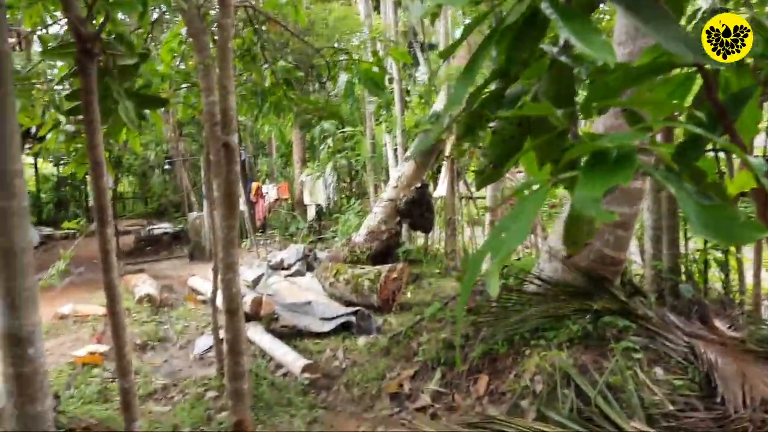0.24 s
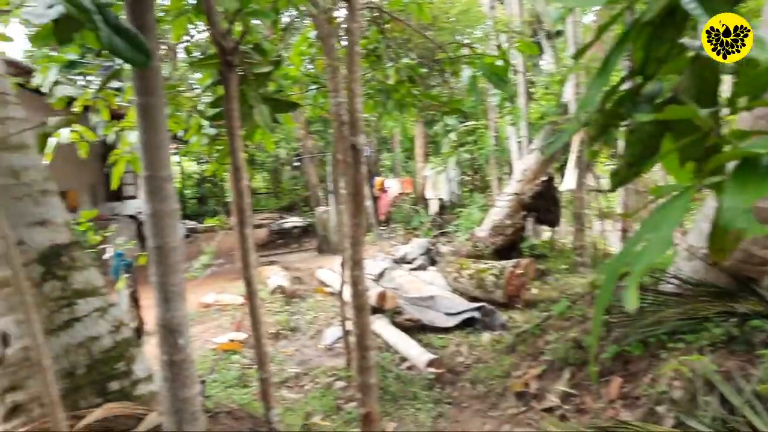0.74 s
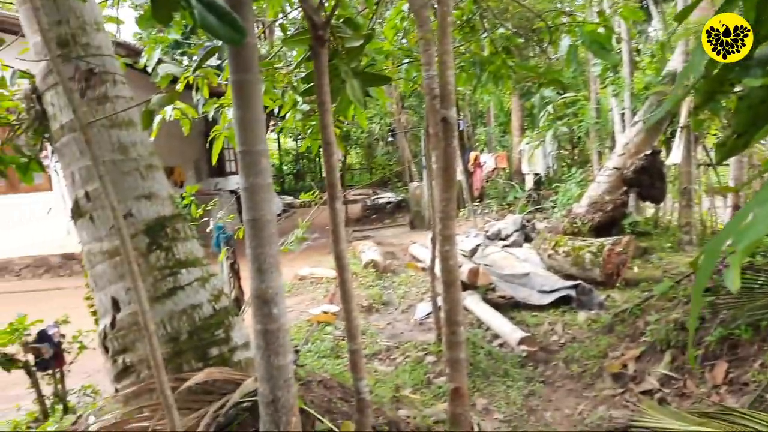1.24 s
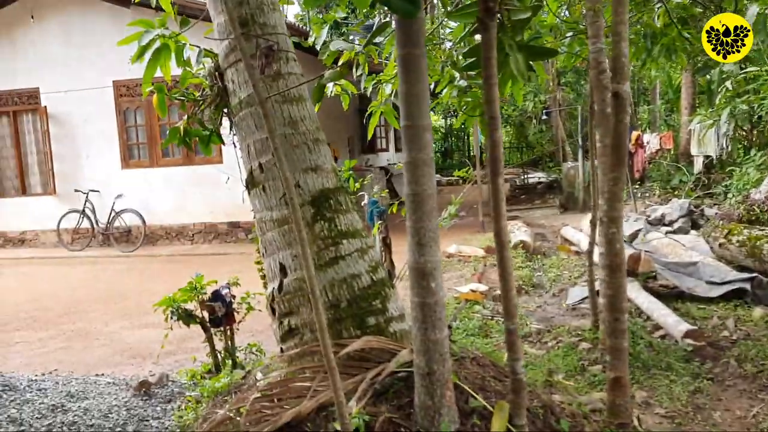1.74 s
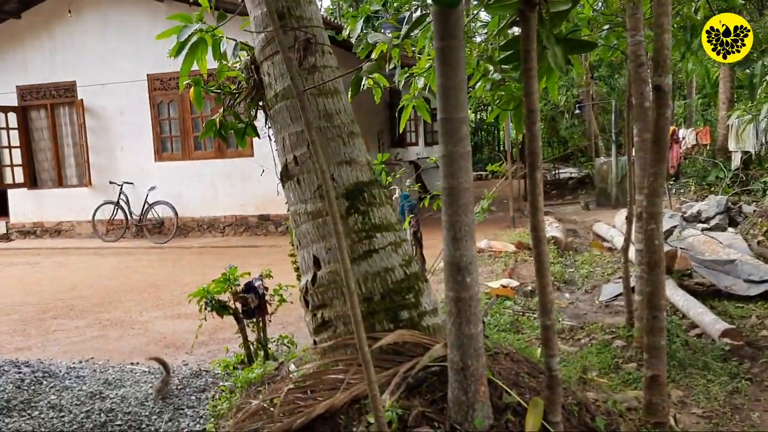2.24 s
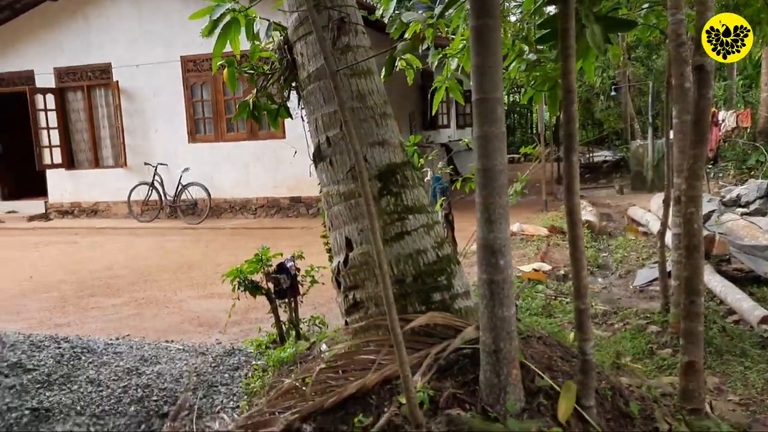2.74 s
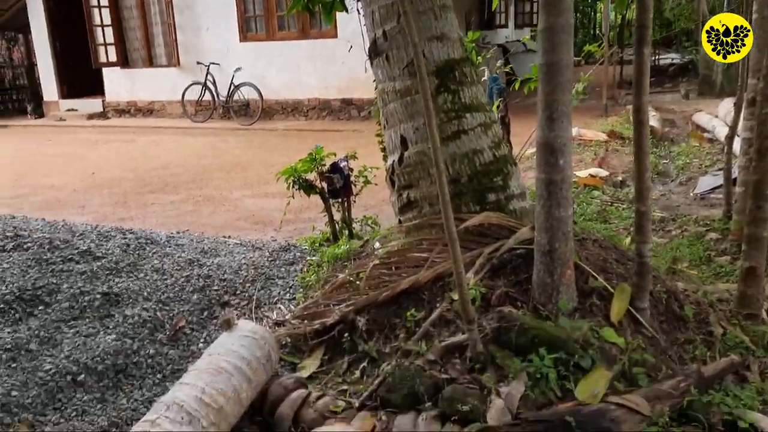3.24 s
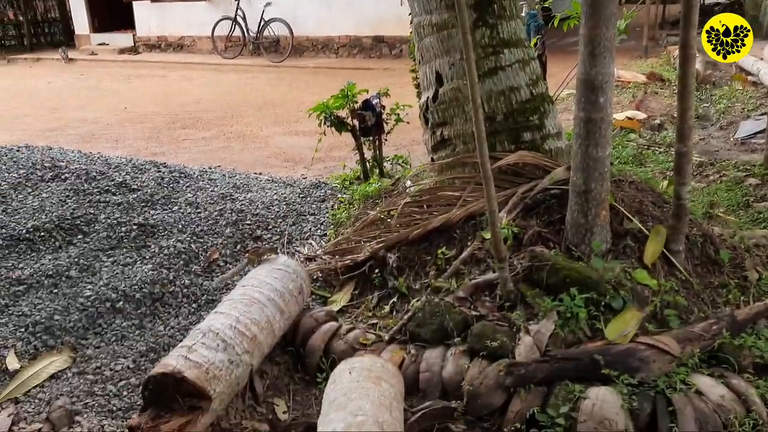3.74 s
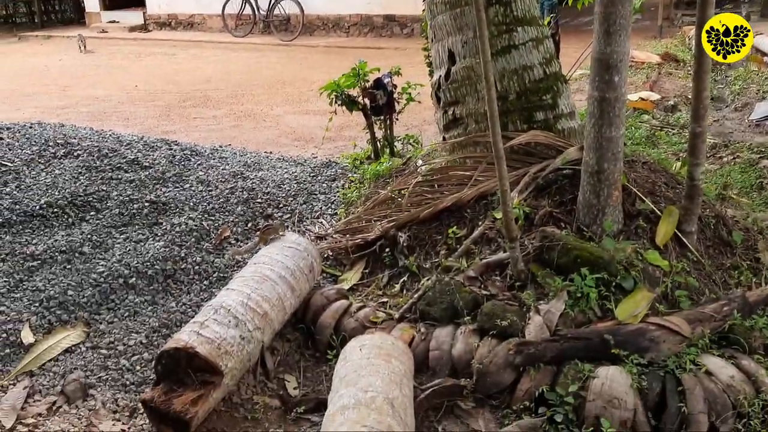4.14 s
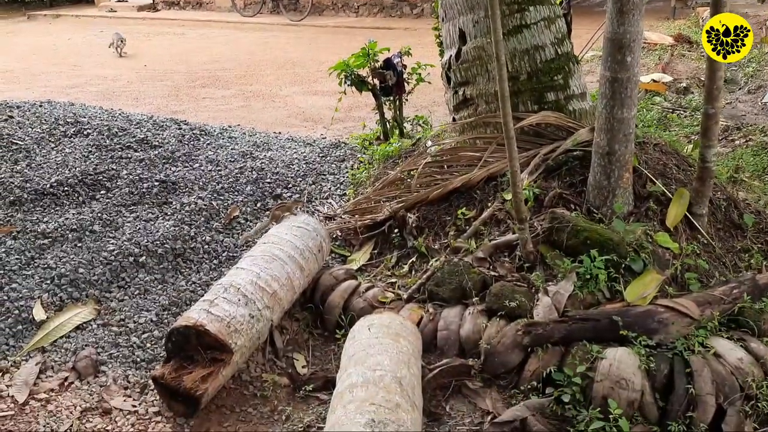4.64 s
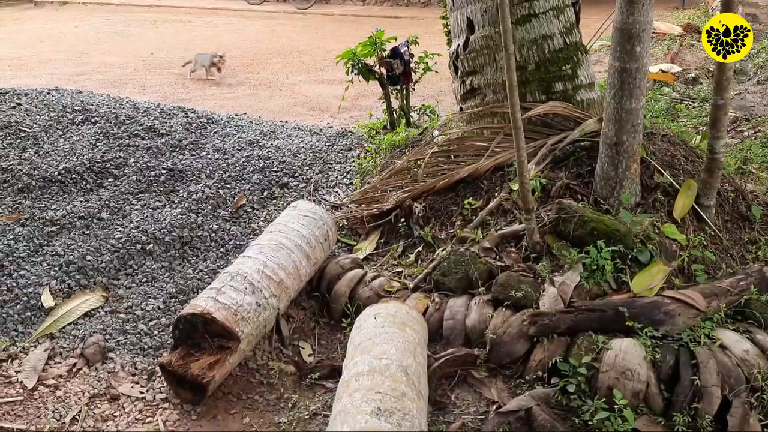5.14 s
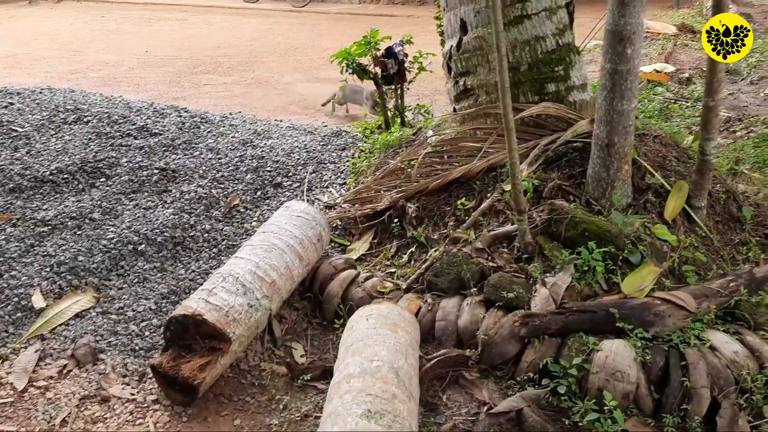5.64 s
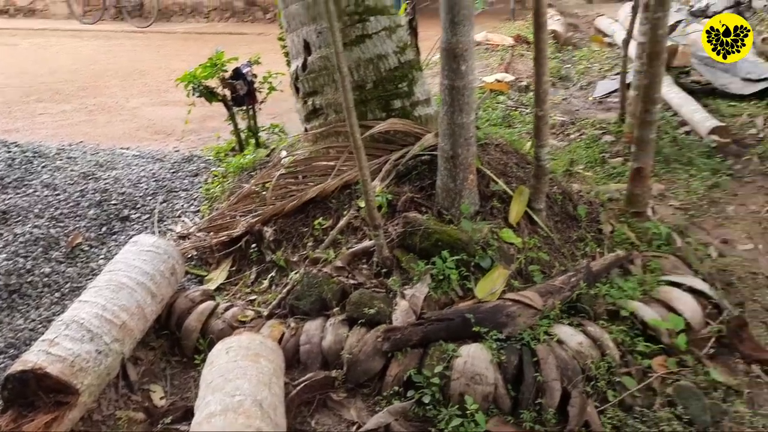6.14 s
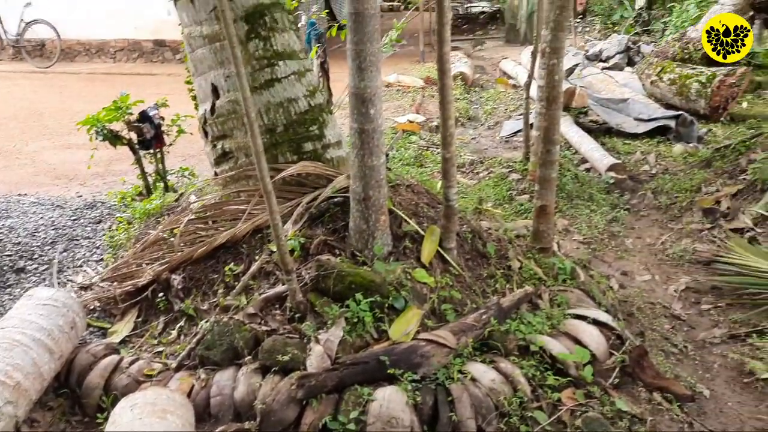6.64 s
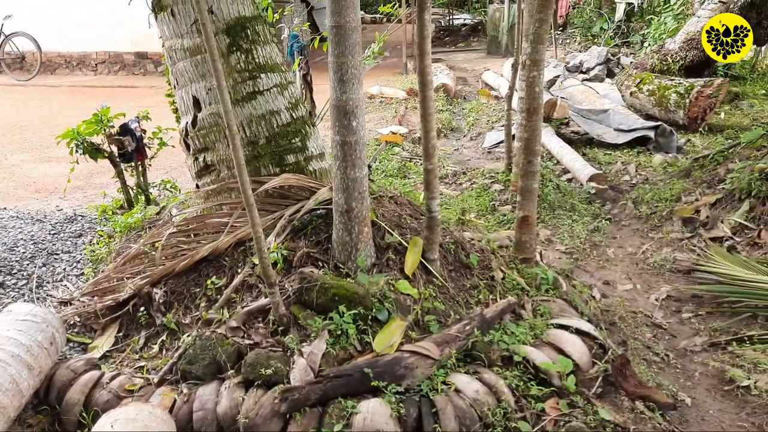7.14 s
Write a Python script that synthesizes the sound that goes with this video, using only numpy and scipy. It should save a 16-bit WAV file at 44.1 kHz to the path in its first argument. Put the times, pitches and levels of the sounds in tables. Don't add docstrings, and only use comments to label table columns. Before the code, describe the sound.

Outdoors among trees beside a house, a hand-held phone picks up low wind and distant traffic rumble, leaf hiss, thin crickets and far bird whistles. Dull knocks hit the case, then hoarse bird chucks repeat. Past the middle, a squirrel fires rapid piercing whistled chips; after a brief gap others answer, joined by a higher voice. Echoes smear every call.

```python
import sys
import numpy as np
from scipy import signal
from scipy.fft import rfft, irfft, next_fast_len
from scipy.io import wavfile
from scipy.ndimage import uniform_filter1d

SR = 44100
rng = np.random.default_rng(int(sys.argv[2]) if len(sys.argv) > 2 else 0)


def to_wav(sig):
    pcm = np.clip(np.atleast_2d(sig), -1, 1) * 32767
    pcm = np.round(pcm).astype(np.int16)
    wavfile.write(sys.argv[1], SR, pcm.T)


def amplitude_ratio(level_db):
    exponent = np.asarray(level_db, float) / 20
    return 10 ** exponent


N = 325899


def level(x, db):
    return x * amplitude_ratio(db) / np.sqrt(np.mean(x ** 2))


def shaped(x, gain):
    size = next_fast_len(N)
    hz = np.arange(size // 2 + 1) * SR / size + 1e-3
    return irfft(rfft(x, size) * gain(hz), size)[..., :N]


def walk(rate):
    hold = int(SR / rate)
    steps = np.repeat(rng.standard_normal(N // hold + 1), hold)
    return 1.385 * uniform_filter1d(uniform_filter1d(steps, hold), hold)[:N]


def add(out, s, sound, pan_db):
    i = int(s * SR)
    out[:, i:i + len(sound)] += amplitude_ratio([[pan_db / 2], [-pan_db / 2]]) * sound[:N - i]


def whistle(rows, overtones, edge_s, hoarse_hz, crack=0):
    s, hz, db = np.transpose(rows)
    t = np.arange(s[0] - edge_s, s[-1] + edge_s, 1 / SR)
    tremble = uniform_filter1d(rng.standard_normal(N // 8)[:len(t)], size=40) * np.sqrt(40)
    pitch = uniform_filter1d(np.interp(t, s, hz), size=200)
    drop = np.log2(pitch.max() / pitch)
    phase = 2 * np.pi * np.cumsum(pitch + hoarse_hz * (1 + crack * drop ** 2) * tremble) / SR
    tone = np.sin(phase)
    for k, (second_up_db, lift) in enumerate(overtones):
        tone = tone + amplitude_ratio(second_up_db + lift * drop) * np.sin((k + 2) * phase)
    fade = np.clip(np.minimum(t - t[0], t[-1] - t) / (2 * edge_s), 0, 1) ** 2
    return np.sqrt(2) * tone * fade * np.interp(t, s, amplitude_ratio(db))


def yard(x, t60_s, wet_db, early_db, sparse_db, lag_s=-0.000408):
    t = np.arange(int(1.2 * SR)) / SR
    echoes = rng.standard_normal((2, len(t))) * amplitude_ratio(sparse_db * rng.exponential(size=(2, len(t))))
    low = signal.sosfiltfilt(signal.butter(4, 7000, fs=SR, output="sos"), echoes)
    late = low * amplitude_ratio(-60 * t / t60_s) + (echoes - low) * amplitude_ratio(2.0 - 60 * t / (0.83 * t60_s))
    late = level(late * (1 - np.exp(-t / 0.0076)), wet_db)
    early = level(echoes[::-1] * amplitude_ratio(-60 * t / 0.036), early_db)
    direct = shaped(x, lambda hz: np.exp(-1j * np.pi * hz * lag_s * np.array([[1], [-1]])))
    echo = (early + late) / np.sqrt(len(t))
    return direct + signal.fftconvolve(np.mean(x, 0, keepdims=True), echo, axes=1)[:, :N]


def air():
    # (frequency [Hz], density [dB per Hz])
    air_colour = [(15, -42), (46, -10), (60, -1.5), (107, 1.5), (163, -16), (558, -19.5), (624, -26),
                  (738, -23.5), (1570, -26), (2320, -25), (3740, -37.5), (4810, -31.5), (5230, -32),
                  (7110, -43), (16000, -59)]
    # (frequency [Hz], correlation [-1..1])
    port_likeness = [
        (60, 1),
        (130, 0.93),
        (290, 0.96),
        (640, 0.37),
        (1400, -0.24),
        (3000, -0.039),
    ]
    # (time [s], level [dB])
    gusts = [
        (0, 5.5),
        (.07, 0),
        (2.5, 0),
        (2.68, 1.5),
        (3.0, -1),
        (5.06, 1),
        (5.91, -2.5),
        (6.5, 1),
        (7.39, 3.5),
    ]
    hz, db = np.transpose(air_colour)
    like_hz, like = np.transpose(port_likeness)
    gust_db = np.interp(np.arange(N) / SR, *np.transpose(gusts))

    def likeness(f):
        return np.clip(np.interp(np.log(f), np.log(like_hz), like), -1, 1)

    def colour(f):
        return amplitude_ratio(np.interp(np.log(f), np.log(hz), db))

    mid = shaped(rng.standard_normal(N), lambda f: colour(f) * np.sqrt(1 + likeness(f)))
    side = shaped(rng.standard_normal(N), lambda f: colour(f) * np.sqrt(1 - likeness(f)))
    both = np.array([mid + side, mid - side])
    rumble = shaped(both, lambda f: 1 / (1 + (f / 170) ** 4))
    murmur = shaped(both - rumble, lambda f: 1 / (1 + (f / 1800) ** 4))
    hiss = both - rumble - murmur
    quiet_db = -57
    hiss = hiss * amplitude_ratio(quiet_db + 0.64 * walk(21)) / np.std(murmur)
    rumble = level(rumble, -49.5) * amplitude_ratio(gust_db + 1.1 * walk(3.5))
    murmur = level(murmur, -52) * amplitude_ratio(gust_db)
    hum_hz = 73 + 1.6 * walk(1.8)
    hum = np.sqrt(2) * amplitude_ratio(-65.5 + 2.4 * walk(1.0)) * np.sin(2 * np.pi * np.cumsum(hum_hz) / SR)
    left_db = -2.5
    return (rumble + murmur + hiss + hum) * amplitude_ratio([[left_db / 2], [-left_db / 2]])


def cricket(gain, hz, trill_hz, depth, smear_hz):
    t = np.arange(N) / SR
    tone = np.sin(2 * np.pi * np.cumsum(hz + smear_hz * walk(250)) / SR)
    throb = 1 + depth * np.sin(2 * np.pi * trill_hz * t)
    return np.sqrt(2) * tone * throb * gain * amplitude_ratio(2.1 * walk(25))


def chirps(rows):
    attack_s, hold_s, fade_db_per_s = 0.004, 0.09, 195
    gain, t = np.zeros((2, N)), np.arange(SR // 2) / SR
    shape = np.clip(t / attack_s, 0, 1) * amplitude_ratio(-fade_db_per_s * np.maximum(t - hold_s, 0))
    for s, db in rows:
        add(gain, s, amplitude_ratio(db) * shape, 0)
    return gain[0]


def insects():
    # (time [s], level [dB])
    low_chirps = [(0, -66.5), (.5, -70.5), (.75, -66), (.98, -69), (5.56, -59.5), (5.73, -59.5),
                  (5.95, -57.5), (6.18, -59.5), (6.41, -57.5), (6.72, -62), (7.05, -59.5), (7.26, -58.5)]
    # (time [s], level [dB])
    high_chirps = [(0, -65.5), (.25, -69), (.47, -71), (.73, -64), (.97, -65.5), (1.2, -64.5), (1.46, -67),
                   (1.79, -68), (2.09, -64), (2.41, -64), (2.69, -73), (2.98, -73), (3.26, -73),
                   (3.55, -72.5), (3.8, -67), (4.05, -74.5), (5.56, -63.5), (5.73, -60)]
    # (time [s], level [dB])
    chorus_level = [
        (1.0, -89),
        (1.2, -70),
        (3.0, -61.5),
        (3.6, -91),
        (4.2, -77.5),
        (5.4, -76),
        (6.0, -68),
        (7.39, -65.5),
    ]
    # (time [s], low voice [Hz], high voice [Hz])
    cricket_pitch = [
        (0, 2487, 4860),
        (1.5, 2440, 4910),
        (2.102, 2364, 4840),
        (3.2, 2296, 4740),
        (4.2, 2405, 4780),
        (5.499, 2505, 5020),
        (6.6, 2516, 5050),
        (6.749, 2457, 5050),
    ]
    t = np.arange(N) / SR
    s, *pitch = np.transpose(cricket_pitch)
    low_hz, high_hz = (np.interp(t, s, hz) for hz in pitch)
    chorus = amplitude_ratio(np.interp(t, *np.transpose(chorus_level)))
    low = cricket(chirps(low_chirps) + chorus, low_hz, trill_hz=47.9, depth=0.24, smear_hz=45.1)
    high = cricket(chirps(high_chirps), high_hz, trill_hz=57.8, depth=0.83, smear_hz=56.3)
    near = yard(amplitude_ratio([[-1.5], [1.5]]) * low + high, t60_s=0.65, wet_db=-3.5, early_db=1, sparse_db=0)
    cicada_hz, cicada_width_hz = 7015, 356
    cicada = shaped(rng.standard_normal((2, N)), lambda hz: np.exp(-.5 * ((hz - cicada_hz) / cicada_width_hz) ** 2))
    return amplitude_ratio(-2.0) * near + level(cicada, -63.5) * amplitude_ratio(walk(6.6))


def birds():
    # (time [s], length [s], start [Hz], end [Hz], level [dB])
    clear_whistles = [(.695, .041, 4070, 3950, -57), (.724, .26, 3960, 3900, -54),
                      (1.075, .1, 3400, 3480, -52), (1.18, .16, 3490, 3490, -58),
                      (1.343, .28, 2860, 2830, -65), (1.456, .13, 3230, 3200, -62),
                      (3.73, .092, 1125, 1167, -56.5), (3.85, .045, 1180, 1210, -68),
                      (5.34, .072, 3420, 3450, -58.5), (5.412, .158, 3640, 3520, -59),
                      (5.626, .116, 2914, 2860, -67), (5.734, .111, 3230, 3190, -69)]
    # (time [s], length [s], start [Hz], end [Hz], level [dB])
    hoarse_sweeps = [
        (.324, 0.18, 1950, 1960, -58.5),
        (.326, 0.15, 1637, 1566, -57.5),
        (.772, 0.068, 5400, 6130, -64),
        (1.03, 0.04, 5250, 6970, -54.5),
        (1.075, .052, 6330, 5240, -55),
        (1.14, 0.057, 5300, 5500, -55),
        (1.23, 0.11, 6630, 6120, -62),
        (4.137, 0.046, 5570, 7060, -60),
        (4.167, 0.066, 6900, 7000, -55),
        (4.213, 0.066, 6620, 5200, -49),
    ]
    # (time [s], length [s], start [Hz], end [Hz], level [dB])
    alarm_peeps = [(4.549, 0.014, 6250, 5860, -49.5), (4.793, 0.01, 6670, 5560, -34),
                   (5.025, 0.008, 6300, 6050, -60), (5.35, 0.011, 5640, 5680, -45.5),
                   (6.053, 0.093, 6400, 6620, -45.5), (6.185, .078, 6240, 6500, -75),
                   (6.44, 0.0077, 5900, 5770, -49.5), (6.717, 0.022, 5560, 5840, -53),
                   (6.927, 0.054, 6220, 6720, -49), (7.092, 0.07, 6930, 6400, -46.5),
                   (7.222, 0.0253, 6870, 6620, -45), (7.11, 0.041, 3560, 3650, -58.5),
                   (7.085, 0.072, 11970, 11500, -61)]
    # (time [s], length [s], start [Hz], end [Hz], level [dB])
    far_coo = [
        (3.618, .68, 625, 613, -68),
    ]
    # (time [s], peak [dB], middle pitch [Hz])
    falling_chucks = [
        (3.036, -50, 2116),
        (3.257, -52, 2260),
        (3.461, -51.5, 2080),
        (3.6631, -51.5, 2097),
        (3.8576, -51, 2306),
        (4.0357, -53.5, 2170),
        (4.2083, -52, 2290),
        (4.3844, -58, 2290),
    ]
    out, chucks = np.zeros((2, 2, N))
    edge_s = .004
    for notes, hoarse_hz in (clear_whistles, 20), (hoarse_sweeps, 200), (alarm_peeps, 220), (far_coo, 45):
        for s, length, hz0, hz1, db in notes:
            rows = [(s, hz0, db), (s + length, hz1, db - 6.5)]
            add(out, s - edge_s, whistle(rows, [], edge_s, hoarse_hz), -1.5)
    for s, db, hz in falling_chucks:
        rows = [(s, 1.08 * hz, db), (s + 0.016, 0.95 * hz, db)]
        chuck = whistle(rows, [(-17.5, 0.017), (-18, 0.0045)], 0.004, hoarse_hz=223)
        add(chucks, s - .006, chuck, -2.5)
    calls = (out + amplitude_ratio(-6) * chucks) * amplitude_ratio(2.6 * walk(18))
    far = yard(calls, t60_s=0.77, wet_db=-0.5, early_db=2.5, sparse_db=4.5)
    return far + amplitude_ratio(2.5) * chucks


def handling():
    # (time [s], peak [dB], ring [Hz], t60 [s])
    case_knocks = [
        (0.625, -42, 204, 0.025),
        (1.629, -30.5, 288, 0.012),
        (2.676, -31.5, 282, 0.024),
        (2.692, -27, 278, 0.015),
        (2.747, -22.5, 248, 0.017),
    ]
    # (time [s], length [s], level [dB], centre [Hz])
    dry_rustles = [
        (0, 0.12, -63.5, 6000),
        (1.482, .08, -67, 7900),
        (1.622, 0.022, -54, 5900),
        (2.284, 0.022, -66, 8000),
        (2.499, 0.064, -75, 8000),
        (3.252, .1, -66, 7000),
        (3.753, 0.18, -66.5, 6560),
        (5.855, 0.012, -70.5, 8000),
        (6.9, .36, -55.5, 14000),
    ]
    out, t = np.zeros((2, N)), np.arange(4000) / SR
    for s, db, hz, t60 in case_knocks:
        decay = amplitude_ratio(db + 5.0 - 60 * t / t60)
        add(out, s, decay * np.sin(2 * np.pi * hz * t) * (1 - np.exp(-t / 0.0011)), -1.5)
    grit = rng.standard_normal((2, N)) * amplitude_ratio(1.7 * rng.exponential(size=N))
    t = np.arange(N) / SR
    for s, length, db, hz in dry_rustles:
        shape = np.sin(np.pi * np.clip((t - s) / length, 0, 1)) * amplitude_ratio(1.3 * walk(70))
        out += shape * level(shaped(grit, lambda f: f / hz / (1 + (f / hz) ** 2)), db)
    return out


def chips(rows, scoop_hz, arch_hz, drop_hz, drop_s, swell_db, second_db, third_db, pan_db):
    attack_s, scoop_s = 0.0066, .01
    curl = 1.522
    out = np.zeros((2, N))
    for s, length, hz0, hz1, db in rows:
        t = np.linspace(0, length, num=40)
        u = np.clip(t / (length - drop_s), 0, 1)
        fall = np.clip((t - length) / drop_s + 1, 0, 1)
        hz = hz0 + (hz1 - hz0) * u ** curl + arch_hz * np.sin(np.pi * u)
        hz = hz - drop_hz * fall ** 1.314 - scoop_hz * np.exp(-t / scoop_s)
        loud = db - 16 * np.clip(1 - t / attack_s, 0, 1) + swell_db * (u - .5) - 27 * fall ** 1.64
        curve = np.transpose([s + t, hz, loud])
        chip = whistle(curve, [(second_db, 22), (third_db, -5)], 0.00236, hoarse_hz=9, crack=140)
        add(out, s - .003, chip, pan_db)
    return out


def squirrels():
    # (time [s], length [s], start [Hz], pitch before the drop [Hz], level [dB])
    flat_chips = [
        (4.556, 0.045, 4740, 4626, -25.5),
        (4.6, 0.027, 4730, 4500, -19.5),
        (4.64, 0.057, 4580, 4470, -27),
        (4.665, 0.094, 4844, 5105, -23),
        (4.81, 0.059, 5110, 4546, -26),
        (4.832, 0.069, 4820, 4605, -24),
        (4.932, 0.045, 4656, 4680, -23),
        (5.02, .085, 4860, 4791, -18),
        (5.255, 0.053, 4610, 4404, -28),
        (5.352, 0.037, 4600, 4385, -35.5),
    ]
    arched_chips = [
        (4.25, 0.097, 4560, 4526, -33),
        (4.742, .075, 4910, 5176, -20.5),
        (5.108, .095, 4797, 5014, -21.5),
        (5.14, 0.079, 4810, 4630, -24.5),
        (7.236, .122, 4592, 4346, -22),
    ]
    sagging_chips = [
        (5.92, 0.094, 5005, 4554, -26.5),
        (6.055, 0.063, 4840, 4310, -31.5),
        (6.252, 0.14, 4902, 4466, -27.5),
        (6.405, 0.064, 5000, 4680, -26),
        (6.43, 0.068, 4633, 4410, -24),
        (6.517, 0.049, 4480, 4550, -32),
        (6.552, .12, 4772, 4400, -24.5),
        (6.731, 0.11, 4773, 4446, -23.5),
        (6.95, 0.056, 4510, 4120, -31),
        (7.093, 0.083, 4574, 4270, -27.5),
    ]
    high_chips = [
        (6.903, .098, 5590, 5280, -25.5),
        (7.047, 0.088, 5533, 5540, -29),
        (7.135, 0.107, 5450, 5556, -41),
    ]
    out = chips(flat_chips, scoop_hz=-49.5, arch_hz=-29, drop_hz=778, drop_s=0.0139,
                swell_db=5.0, second_db=-18.5, third_db=-20, pan_db=2.5)
    out += chips(arched_chips, scoop_hz=119, arch_hz=248.7, drop_hz=815, drop_s=.018,
                 swell_db=3.5, second_db=-17, third_db=-21.5, pan_db=4)
    out += chips(sagging_chips, scoop_hz=70, arch_hz=70.4, drop_hz=1093, drop_s=.02,
                 swell_db=2.5, second_db=-18.5, third_db=-24, pan_db=2.5)
    out += chips(high_chips, scoop_hz=29.7, arch_hz=42.4, drop_hz=356, drop_s=.015,
                 swell_db=2.5, second_db=-26, third_db=-43, pan_db=4.0)
    breath = shaped(rng.standard_normal(N), lambda hz: 1 / (1 + ((hz - 3280) / 700) ** 2))
    out += level(breath, -39) * uniform_filter1d(np.abs(out), size=300)
    voices = amplitude_ratio(-2.0 + 1.4 * walk(70)) * out
    return yard(voices, t60_s=0.53, wet_db=-1.0, early_db=-2, sparse_db=2.2, lag_s=-0.000373)


def scene():
    return air() + insects() + birds() + handling() + squirrels()


def masking(x, under_db, from_hz):
    hz, _, z = signal.stft(x, SR, nperseg=2048)
    bands = np.abs(z[:, :-1]).reshape(2, 64, 16, -1) ** 2
    power = bands.sum(axis=2, keepdims=True)
    treble = hz[:-1:16, None, None] > from_hz
    treble_power = (power * treble).sum(axis=1, keepdims=True)
    keep = (power > amplitude_ratio(-2 * under_db) * treble_power) | ~treble
    z[:, :-1] *= np.broadcast_to(keep, bands.shape).reshape(z[:, :-1].shape)
    return signal.istft(z, SR)[1][:, :N]


def top_cut(x):
    return signal.sosfilt(signal.butter(12, 16300, fs=SR, output="sos"), x)


def record(dry):
    def ports(hz):
        tilt_db = np.array([[-1], [1]]) * 3.5 * np.clip((hz - 6500) / 2500, 0, 1)
        return amplitude_ratio(tilt_db - np.clip(hz - 15200, 0, 2000) / 25)

    mix = masking(shaped(dry, ports), under_db=45.5, from_hz=3700)
    return top_cut(mix)


dry = scene()
out = record(dry)
to_wav(out)
```